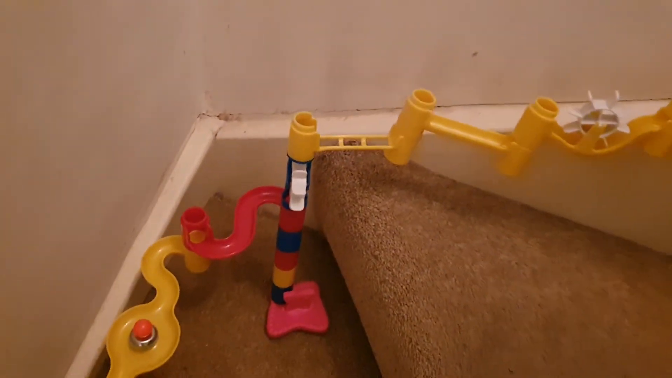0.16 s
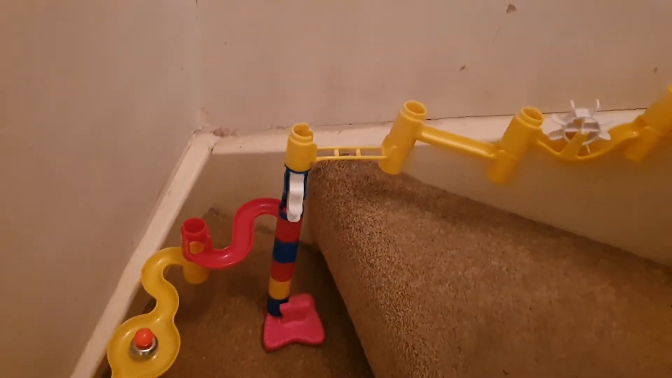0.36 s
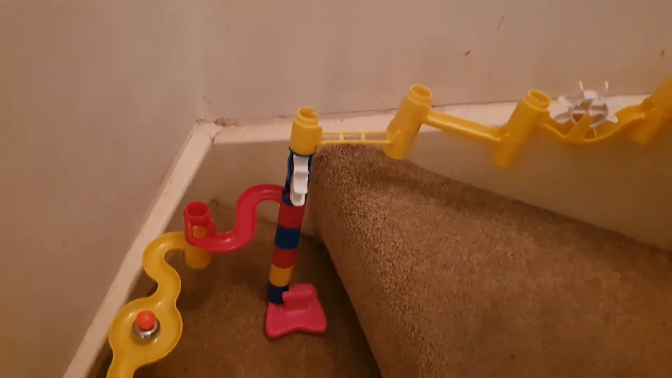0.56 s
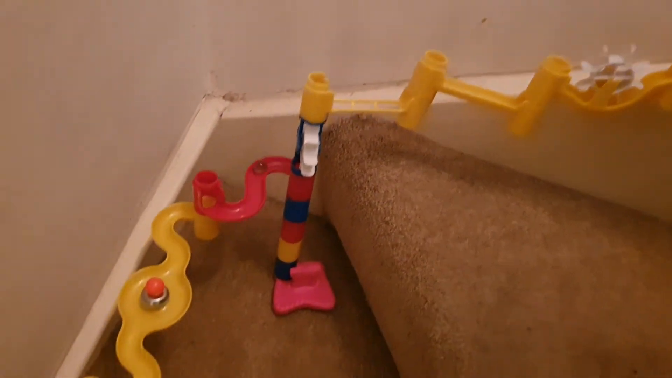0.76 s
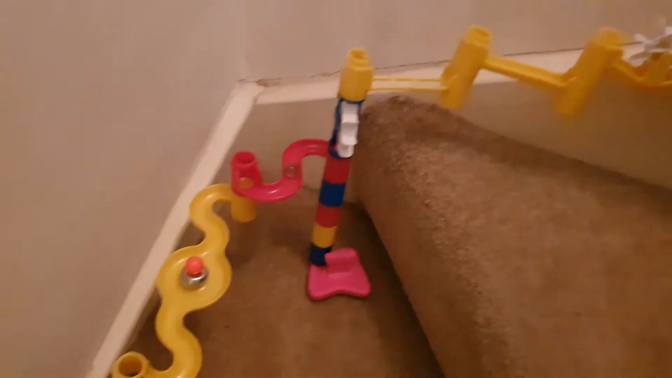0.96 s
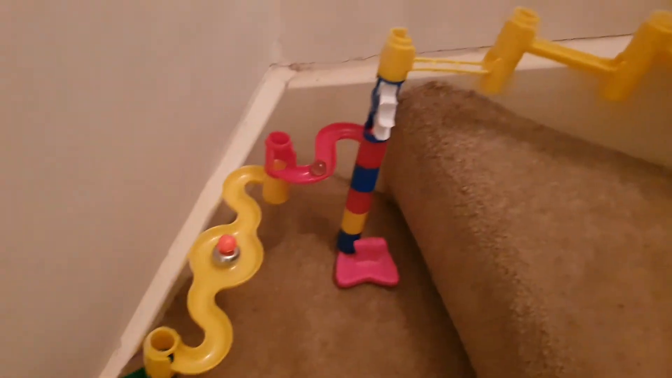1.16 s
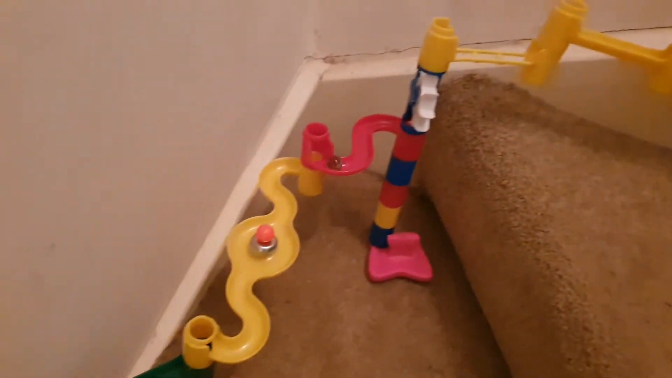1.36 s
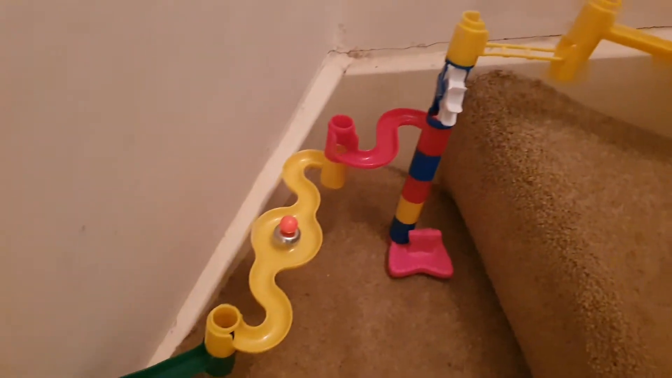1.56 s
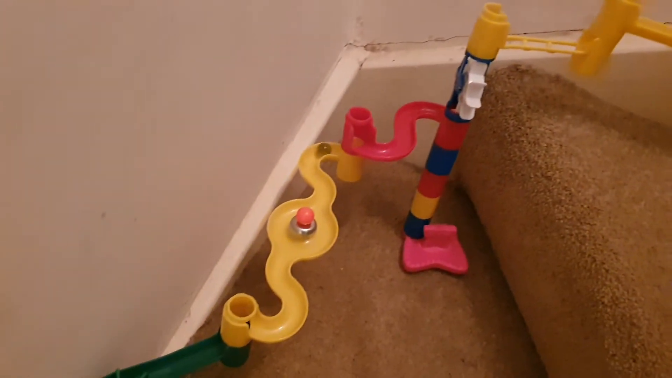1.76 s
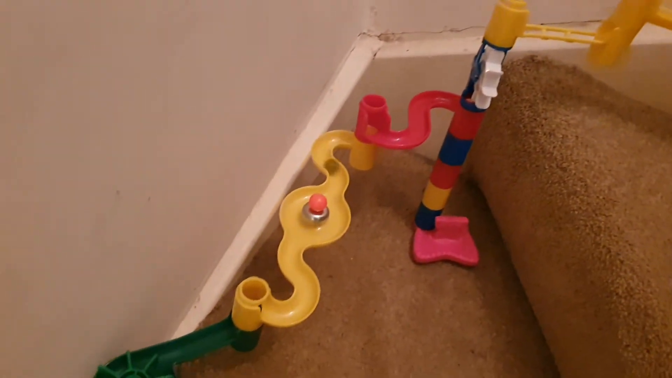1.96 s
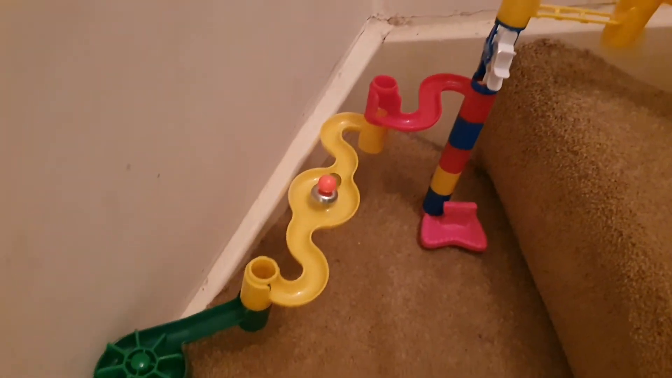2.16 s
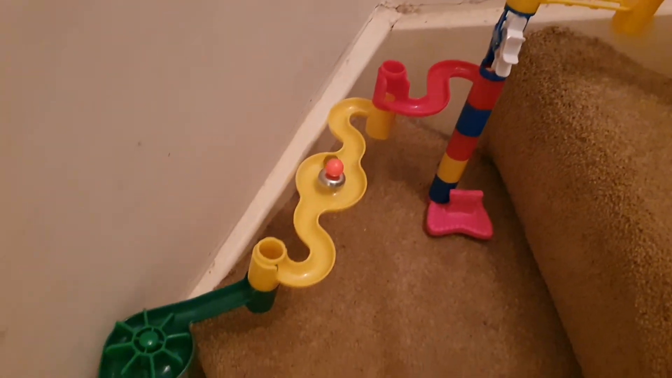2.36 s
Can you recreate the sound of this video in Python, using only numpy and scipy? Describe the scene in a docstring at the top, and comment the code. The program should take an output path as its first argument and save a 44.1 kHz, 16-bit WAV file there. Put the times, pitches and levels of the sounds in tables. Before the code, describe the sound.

A marble rattles and cracks down hollow plastic track pieces, rolling quietly between bursts of clicks

```python
"""Glass marbles run down a plastic track on a carpeted staircase, in stereo, over 2.45 s.
First a burst rattles through the chute, the joint and the tube: clicks, cracks and struck modes, with room echo.
Then rolling stands out, a crowd of tiny contacts in track resonances, and a soft noise scuff passes at 0.78 s.
From about 1 s the bend is struck, clattering near 1.5 s; last, two clacks ring the wheel at 2.16 s.
Decaying low modes bump underneath; a faint noise rustle fades away; hum and a low noise floor stay throughout."""
import sys
import numpy as np
from scipy import signal
from scipy.io import wavfile

SR = 44100
rng = np.random.default_rng(int(sys.argv[2]) if len(sys.argv) > 2 else 0)


def log_audio(samples):
    """Write samples as a 16-bit WAV file to the path given in sys.argv[1]."""
    # one column per channel
    frames = np.atleast_2d(samples).T
    # limit to full scale, then quantise
    limited = np.clip(frames, -1, 1)
    pcm = np.round(limited * 32767).astype(np.int16)
    wavfile.write(sys.argv[1], SR, pcm)


N = 108045
TIME = np.arange(N) / SR

# Noise and cracks are shaped in these bands: edges and centres f/Hz
EDGES = np.concatenate([np.geomspace(22, 1400, 13)[:-1], np.geomspace(1400, 17000, 15)])
CENTRES = np.sqrt(EDGES[:-1] * EDGES[1:])
BANK = [signal.butter(2, edge, "band", fs=SR, output="sos") for edge in zip(EDGES, EDGES[1:])]


def from_db(db):
    """Decibels to amplitude gain."""
    return 10 ** (np.asarray(db) / 20)


def unit(x):
    """Scale to rms 1."""
    return x / np.sqrt(np.mean(x ** 2) + 1e-30)


def at_hz(points, hz):
    """Read a table on a log-frequency axis."""
    f, v = np.transpose(points)
    return np.interp(np.log(hz), np.log(f), v)


def level(points):
    """A level curve (t/s, level/dB) as gain per sample."""
    return from_db(np.interp(TIME, *np.transpose(points)))


def sides(right_db):
    """Left and right gains that differ by right_db."""
    return from_db(np.array([[-.5], [.5]]) * right_db)


# How much of a strike's right-side bias each frequency shows: f/Hz, share
BIAS_SHARE = [(250, 0), (700, -1.1), (1700, -.1), (3800, 0.48), (6500, 1), (10000, .3), (15000, .1)]


def strike_sides(right_db, hz):
    """Left and right gains of a strike, whose sideways bias depends on frequency."""
    return sides(right_db * at_hz(BIAS_SHARE, hz))


def add(out, s, x):
    """Mix a sound in from s seconds on."""
    i = int(s * SR)
    out[:, i:i + x.shape[1]] += x[:, :N - i]


def band_gains(colour):
    """Gain of each band for a spectrum of relative dB per Hz; total power 1."""
    gains = from_db(at_hz(colour, CENTRES)) * np.sqrt(np.diff(EDGES))
    return gains / np.linalg.norm(gains)


# Likeness of the left and right channels: f/Hz, correlation
LIKENESS = [(50, 0.97), (130, 1), (300, 0.76), (700, 0.67), (1400, 0.086), (15000, 0)]


def noise_pair(hz, size):
    """White stereo noise, mid and side mixed to the left-right likeness at this frequency."""
    alike = np.clip(at_hz(LIKENESS, hz), -1, 1)
    mid, side = rng.standard_normal((2, size))
    return np.sqrt(1 + alike) * mid + np.sqrt(1 - alike) * side * np.array([[1], [-1]])


def coloured(colour):
    """Steady stereo noise summed from bands to a given spectrum; about rms 1."""
    out = 0
    for gain, sos, hz in zip(band_gains(colour), BANK, CENTRES):
        out = out + gain * unit(signal.sosfilt(sos, noise_pair(hz, N)))
    return out


def resonate(x, hz, width_hz):
    """A two-pole resonance with a peak gain of about 1."""
    r = np.exp(-np.pi * width_hz / SR)
    poles = [1, -2 * r * np.cos(2 * np.pi * hz / SR), r * r]
    return (1 - r * r) / 2 * signal.lfilter([1, 0, -1], poles, x)


RING_DB = -3          # all ringing, relative to the table
RING_ROOM_DB = -5     # the ring reaches the stairwell more weakly than the clack
WALL_ECHO_S, WALL_ECHO_DB = .0104, -11
# How a strike on each piece reaches the microphones:
# first click level/dB in the crack, crack decay t/s, stairwell send/dB, right-side bias of the ring/dB
CONTACT_OF = {"chute": (7, .007, .5, 7), "joint": (13, .003, -1, 7), "tube": (12, .004, -2, 7),
              "bend": (14, .0025, .5, 7), "wheel": (17, .0025, 0.5, 15)}
# Marble strikes: t/s, relative level/dB, right-side bias/dB, bass tilt/dB, treble tilt/dB,
# ring level/dB relative to the strike, piece of track
STRIKES = [(0.108, -52.5, 3, 15, -5, -11, "chute"), (0.196, -40, -1, 9, 1.5, 0, "chute"),
           (0.2204, -21, 6, 6, 2, 3, "chute"), (0.2458, -23.5, 2, -6, -2.5, 3, "chute"),
           (0.2533, -24, 4, -20, -20, 10, "chute"), (0.2778, -32, 14, 8, -11.5, -3, "chute"),
           (0.2979, -21, 3, 2, -3, 8, "chute"), (0.3952, -26, 7, 10, -11, 9, "chute"),
           (0.4260, -26, 6, 2, -15, -4, "chute"), (0.4578, -12.5, 3, -2, 5, 0, "joint"),
           (0.502, -11, 0, -6.5, 0, 2.5, "tube"), (0.5229, -18.5, 3, -4, -2, 1, "tube"),
           (0.5538, -22.5, 2, -2, -4, 3, "tube"), (1.037, -57, 1, 20, -15, -6, "bend"),
           (1.4615, -37.5, 2.5, 8, -18, 3, "bend"), (1.5359, -21.5, 8, 6, 0, -2, "bend"),
           (1.5905, -16.5, 17, -4, -0.5, -9, "bend"), (1.615, -33, 4, 3, -8, 2, "bend"),
           (1.6332, -22, 3, 0, -2, 4, "bend"), (1.646, -29, 3, 0, -4, 2, "bend"),
           (1.657, -33, 3, 0, -12, 3, "bend"), (1.6815, -32, 3, 7, -17, 4, "bend"),
           (2.1575, -32.5, -0.5, 7, 2.5, -3, "wheel"), (2.1611, -21, 6, -7, 5, 2, "wheel")]


def strikes():
    """Every strike clacks, sets its piece ringing, slaps back from the wall and echoes in the stairwell."""
    near, echoing = np.zeros((2, 2, N))
    for s, db, right_db, bass_db, treble_db, ring_db, piece in STRIKES:
        _, _, room_db, ring_right_db = CONTACT_OF[piece]
        hit = from_db(db) * clack(piece, right_db, bass_db, treble_db)
        ring = from_db(db + ring_db + RING_DB) * ringing(piece, ring_right_db)
        for sound, send_db in ((hit, room_db), (ring, room_db + RING_ROOM_DB)):
            add(near, s, sound)
            add(echoing, s, from_db(send_db) * sound)
        add(near, s + WALL_ECHO_S, from_db(WALL_ECHO_DB) * hit)
    return near + stairwell(echoing)


CRACK_RISE_S, RIGHT_LEADS_S = .00027, .00025
ARRIVALS_PER_S, HISS_DB = 2200, -9   # separate wavefronts leaving the plastic; the smooth sound between them
SHELL_DB, SHELL_S = -14, .01         # tail of the crack: the crowd of short shell resonances
CLACK_DB = -2.5
# Colour of a strike on each piece: f/Hz of the points, then relative level/dB per Hz at each point
COLOUR_HZ = [200, 480, 830, 1250, 1700, 2150, 3200, 4200, 5200, 6400, 8400, 10700, 13200, 15300]
COLOUR = { "chute": [-13, -12, -8.5, -12, -2.5, -4, 1.5, 2, 2, 2, -9, 1.5, -17, -9.5], "joint": [-17, -14,
          -15, -15, -11, -9, 1.5, -2, -2, -8, -26, -14, -26, -21], "tube": [-20, -15, -16, -21, -10.5, -17,
          2.5, 2.5, -6, -7, -27, -16, -28, -23], "bend": [-16.5, -15.5, -9.5, -13.5, -11, -7, 1, -1, -1, -1,
          -34, -12, -24.5, -19], "wheel": [-22, -9.5, -4.5, -7, -6, -6, 2, 2, 0, -1, -34, -17, -33, -18.5]}


def clack(piece, right_db, bass_db, treble_db):
    """Glass on plastic: a click, then wavefronts bouncing inside the shell, a crack of a few ms and its tail."""
    t = TIME[:SR // 10]
    click_db, crack_s, _, _ = CONTACT_OF[piece]
    decay = np.exp(-t / crack_s) + from_db(SHELL_DB) * np.exp(-t / SHELL_S)
    envelope = (1 - np.exp(-t / CRACK_RISE_S)) * decay

    share = ARRIVALS_PER_S / SR
    arrivals = rng.random((2, len(t))) < share
    fronts = envelope * arrivals * rng.choice([-1, 1], (2, len(t))) / np.sqrt(share)
    # The first click comes to the right channel before the left
    fronts[0, int((CRACK_RISE_S + RIGHT_LEADS_S) * SR)] = from_db(click_db)
    fronts[1, int(CRACK_RISE_S * SR)] = from_db(click_db)
    hiss = from_db(HISS_DB) * envelope * rng.standard_normal(len(t))
    crack = shell(fronts + hiss, piece)

    tilt_db = at_hz([(900, bass_db), (3000, 0), (5000, 0), (9500, treble_db)], CENTRES)
    gains = band_gains(list(zip(COLOUR_HZ, COLOUR[piece]))) * from_db(tilt_db)
    out = 0
    for k, (gain, sos, hz) in enumerate(zip(gains, BANK, CENTRES)):
        band = signal.sosfilt(sos, crack * (-1) ** k)   # neighbouring bands in opposite polarity
        balanced = np.array([unit(channel) for channel in band])
        out = out + gain * strike_sides(right_db, hz) * balanced
    # rms is set over 100 ms; the root of 10 brings it to the energy of 10 ms
    return out * from_db(CLACK_DB) / np.sqrt(10)


SHELL_BOOST_DB, SHELL_WIDTH_HZ = 7, 170
# What each piece rings with, also lifted by its shell: f/Hz, relative level/dB, t60/s
MODES_OF = { "chute": [(815, -23, .11), (1660, -25, .05), (2690, -15.5, .13), (3160, -23, .09),
            (3568, -14, .12), (3945, -11, .075), (4035, -13, .07)], "joint": [(2770, -5, .09),
            (3400, -14, .09), (3530, -10, .05), (3935, -13, .07), (4660, -15, .05), (4965, -11, .06),
            (5620, -11, .04)], "tube": [(1630, -24, .14), (2765, -14, .14), (3278, -16, .2),
            (3381, -13, .24), (3465, -13, .25), (3530, -2, .04), (4110, -3.5, .04), (4400, -18, .14),
            (4700, -10, .03), (6700, -23, .07)], "bend": [(845, -22, .25), (2211, -19, .2),
            (2435, -14, .23), (2750, -16, .15), (2975, -10.5, .29), (3032, -17, .22), (3440, -16, .16),
            (3700, -16, .15), (4560, -16, .16), (5600, -21, .06)], "wheel": [(2778, -13, .16),
            (2815, -11, .2), (3970, -19, .05), (4969, -5, .34), (6550, -21, .03), (12140, -14, .18),
            (12230, -17, .15), (15390, -26, .12)]}


def shell(x, piece):
    """The plastic shell lifts a band around each of its modes."""
    peaks = sum(resonate(x, hz, SHELL_WIDTH_HZ) for hz, _, _ in MODES_OF[piece])
    return x + from_db(SHELL_BOOST_DB) * peaks


RING_SCATTER_DB = 1.5   # standard deviation of each mode's strength


def ringing(piece, right_db):
    """The long modes of a piece are decaying sines, struck with slightly new strengths each time."""
    t, out = TIME[:SR // 2], 0
    for hz, db, t60 in MODES_OF[piece]:
        strength = from_db(db + RING_SCATTER_DB * rng.normal() - 60 * t / t60)
        tone = np.sin(2 * np.pi * (hz * t + rng.random((2, 1))))   # a random phase per channel
        out = out + strength * strike_sides(right_db, hz) * tone
    return out * (1 - np.exp(-t / CRACK_RISE_S))


ROOM_DELAY_S, ROOM_BUILD_S = .0017, .002
# Stairwell decay: f/Hz, t60/s
ROOM_T60 = [(200, .4), (800, 0.21), (2000, 0.28), (5000, 0.22), (10000, 0.31), (15000, .22)]
# Stairwell strength: f/Hz, level/dB
ROOM_DB = [(200, 2), (800, 1.5), (2000, .5), (3500, -8), (6000, -10), (10000, -10.5), (15000, -10)]


def stairwell(x):
    """A short diffuse echo, a moment late: decaying noise whose decay and strength vary with frequency."""
    t, response = np.maximum(TIME[:SR // 2] - ROOM_DELAY_S, 0), 0
    for sos, hz, width in zip(BANK, CENTRES, np.diff(EDGES)):
        fade = np.exp(-np.log(1000) * t / at_hz(ROOM_T60, hz)) * (1 - np.exp(-t / ROOM_BUILD_S))
        band = unit(signal.sosfilt(sos, fade * noise_pair(hz, len(t))))
        response = response + band * from_db(at_hz(ROOM_DB, hz)) * np.sqrt(2 * width / SR / len(t))
    return signal.fftconvolve(x, response, axes=1)[:, :N]


TRACK_CHANGE_S, ROLL_GRAINS_PER_S, GRAIN_SPREAD_DB, ROLL_TOP_HZ = 1.3, 2400, 2.5, 5500
# Rolling: t/s, level/dB
ROLL = [(0, -59), (.2, -59), (.65, -55.5), (.9, -63.5), (1.03, -55), (1.25, -64), (1.45, -60), (1.8, -53.5),
        (1.9, -61.5), (1.97, -56.5), (2.12, -55), (2.25, -55), (2.45, -65.5)]
# Track resonances under a marble: f/Hz, width/Hz, relative level/dB on the upper track, on the lower track
ROLL_BODY = [(380, 270, -0.5, -7), (490, 80, 0, -4), (660, 120, -1, -8), (840, 160, -17, 1),
             (1330, 59, -7.5, -9), (2300, 700, -15.5, -8), (3400, 470, -5.5, -11.5)]


def rolling():
    """Tiny contacts of a rolling marble feed the resonances of the track under it."""
    contacts = rng.random(N) < ROLL_GRAINS_PER_S / SR
    grains = contacts * from_db(GRAIN_SPREAD_DB * np.minimum(rng.exponential(1, N), 4))
    out = 0
    for hz, width_hz, upper_db, lower_db in ROLL_BODY:
        tone = unit(resonate(grains * noise_pair(hz, N), hz, width_hz))
        out = out + tone * level([(TRACK_CHANGE_S - .1, upper_db), (TRACK_CHANGE_S + .1, lower_db)])
    dulled = signal.sosfilt(signal.butter(4, ROLL_TOP_HZ, fs=SR, output="sos"), out)
    return unit(dulled) * level(ROLL)


BUMP_RISE_S = .004
# Low bumps through the stairs: t/s, relative level/dB
BUMPS = [(.11, -51.5), (0.196, -42), (0.227, -38.5), (.40, -45), (0.46, -41.5), (0.553, -42), (0.786, -46),
         (1.006, -55.5), (1.265, -42), (1.458, -50.5), (1.545, -45.5), (1.619, -42.5), (2.17, -47.5)]
# Low modes of the stairs: f/Hz, relative level/dB, t60/s
STAIR_MODES = [(42.5, -5.5, 0.6), (71, -4.5, 0.3), (97.3, -2.5, .25), (114.6, 2, .3), (178, -1, .16),
               (231.6, -7, 0.093)]


def bumps():
    """Dull bumps set the low modes of the stairs ringing, alike in both channels."""
    t, out = TIME[:SR // 2], np.zeros((2, N))
    for s, db in BUMPS:
        for hz, mode_db, t60 in STAIR_MODES:
            fade = np.exp(-np.log(1000) * t / t60) * (1 - np.exp(-t / BUMP_RISE_S))
            tone = np.sin(2 * np.pi * (hz * t + rng.random((1, 1))))
            add(out, s, from_db(db + mode_db) * fade * tone)
    return out


SCUFF_AT_S, SCUFF_WIDTH_S, SCUFF_DB, SCUFF_RIGHT_DB = .7817, .032, -44, 5.5
# Spectrum of the scuff: f/Hz, relative level/dB per Hz
SCUFF_COLOUR = [(60, -7), (220, 3.5), (420, 6.5), (650, -7.5), (1200, -4), (2000, 0.5), (3300, -0.5),
                (6000, -4.5), (8000, -30), (15000, -23)]
# Faint rustle: t/s, level/dB before it is leaned to the right
RUSTLE = [(0, -68), (.4, -53.5), (.65, -66), (.85, -62.5), (1.16, -71), (1.24, -85), (1.41, -67),
          (1.55, -84.5), (2.45, -94.5)]
# Spectrum of the rustle: f/Hz, relative level/dB per Hz
RUSTLE_COLOUR = [(300, -19.5), (2000, 4.5), (5500, 3.5), (8000, -9.5), (12000, -0.5), (15500, -6.5)]


def rubbing():
    """One soft swell of noise for a scuff and a faint noise rustle, as of cloth and carpet."""
    swell = np.exp(-.5 * ((TIME - SCUFF_AT_S) / SCUFF_WIDTH_S) ** 2)
    scuff = from_db(SCUFF_DB) * swell * sides(SCUFF_RIGHT_DB) * coloured(SCUFF_COLOUR)
    rustle = level(RUSTLE) * sides(right_db=2.5) * coloured(RUSTLE_COLOUR)
    return scuff + rustle


HUM_HZ, HUM_DB, FLOOR_DB = 529, -66, -56.5
# Spectrum of the quiet house: f/Hz, relative level/dB per Hz
FLOOR_COLOUR = [(25, -17.5), (43, 5.5), (55, -12), (70, -4), (90, -1), (125, -7), (250, -16), (550, -15.5),
                (1200, -25), (2500, -25), (4000, -26), (6300, -32), (8000, -49), (15000, -46)]


def quiet_house():
    """A steady sine hum over a steady, mostly low noise floor."""
    hum = from_db(HUM_DB) * unit(np.sin(2 * np.pi * HUM_HZ * TIME))
    return hum + from_db(FLOOR_DB) * sides(right_db=1.5) * coloured(FLOOR_COLOUR)


def scene():
    """The track on the stairs over the quiet of the house."""
    return strikes() + rolling() + bumps() + rubbing() + quiet_house()


LOW_CUT_HZ, CUTOFF_HZ = 36, 15900


def record(dry):
    """At the microphones the deepest bass is lost, peaks past full scale overload, the top is cut."""
    thinned = signal.sosfilt(signal.butter(4, LOW_CUT_HZ, "high", fs=SR, output="sos"), dry)
    overloaded = np.clip(thinned, -1, 1)
    return signal.sosfilt(signal.ellip(10, .2, 80, CUTOFF_HZ, fs=SR, output="sos"), overloaded)


dry = scene()
out = record(dry)
log_audio(out)
```